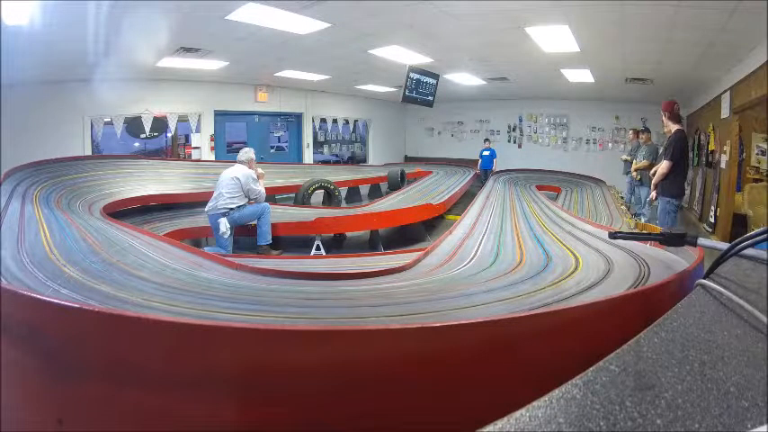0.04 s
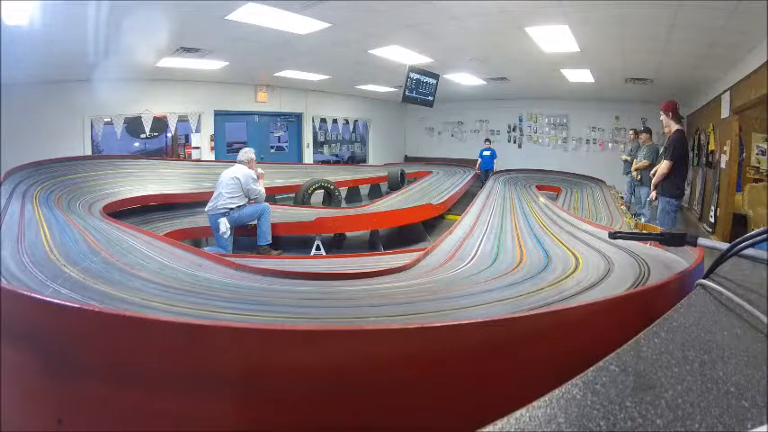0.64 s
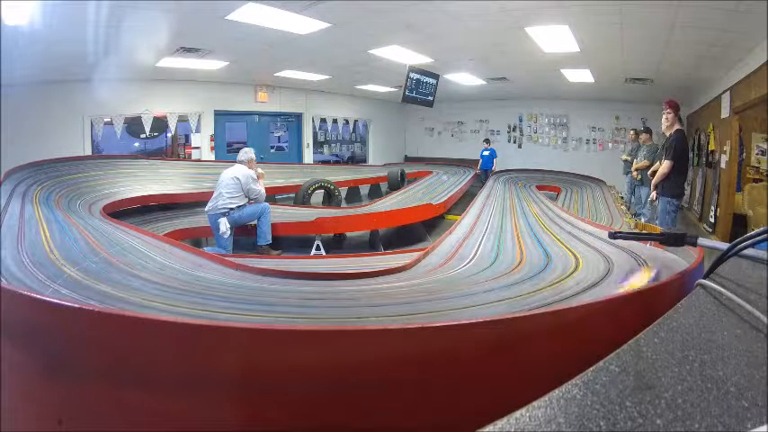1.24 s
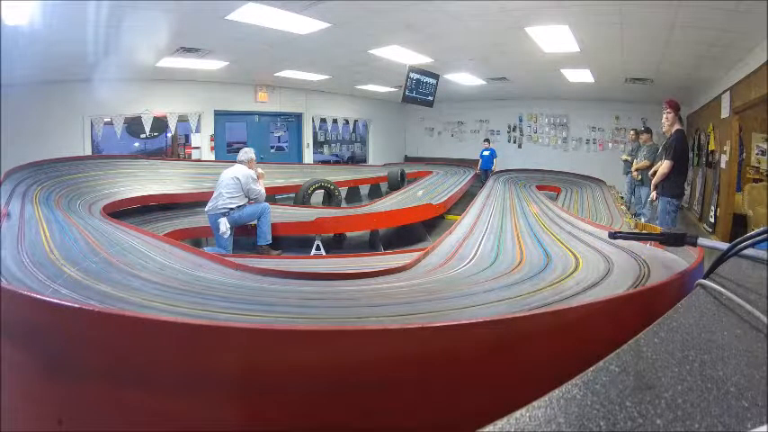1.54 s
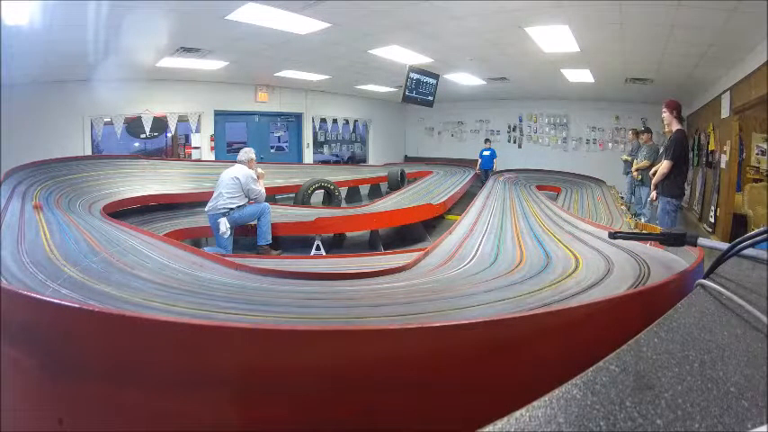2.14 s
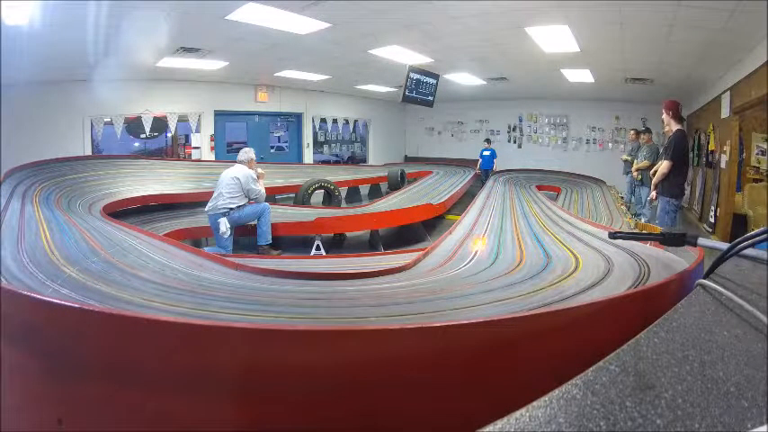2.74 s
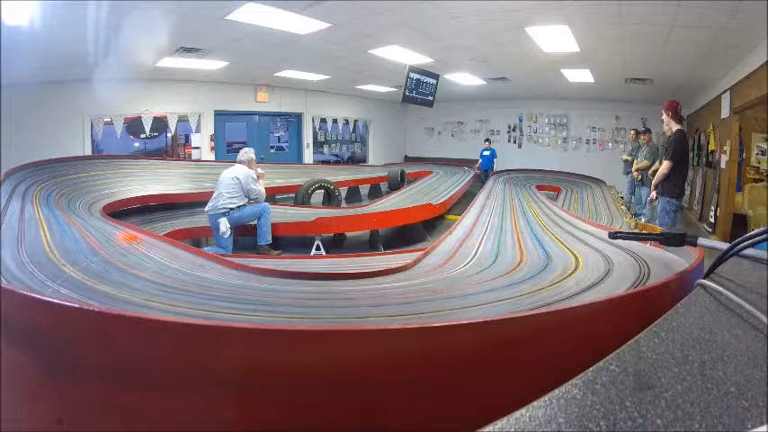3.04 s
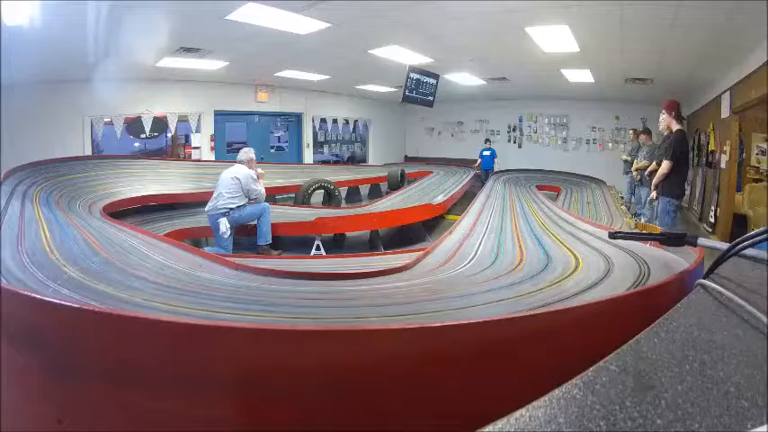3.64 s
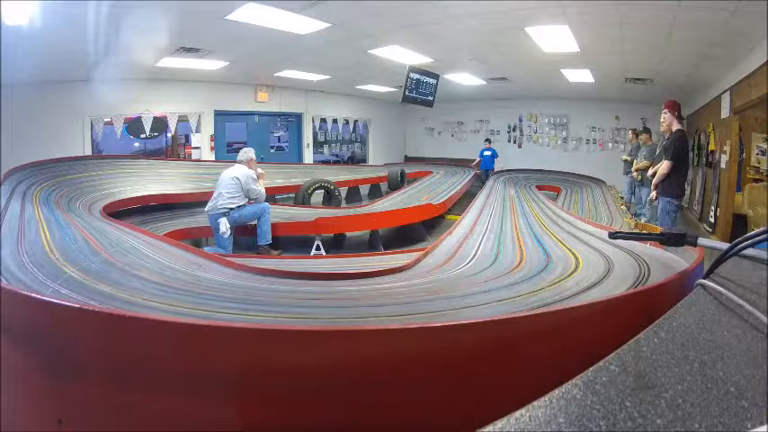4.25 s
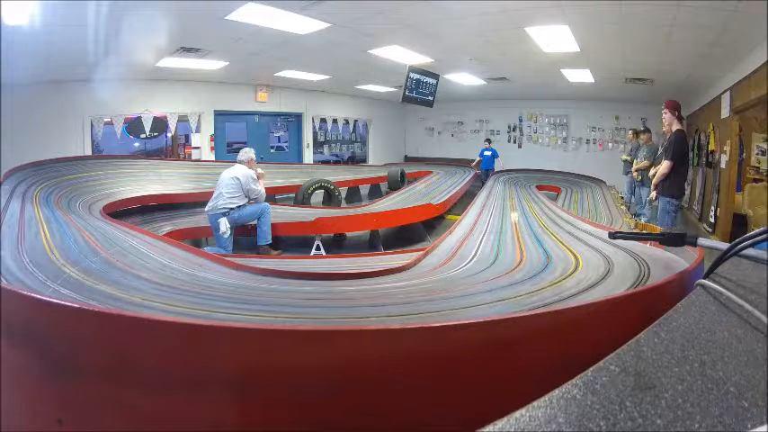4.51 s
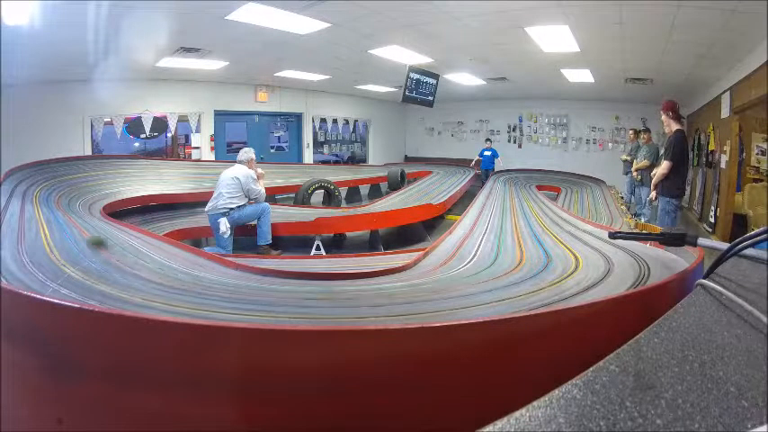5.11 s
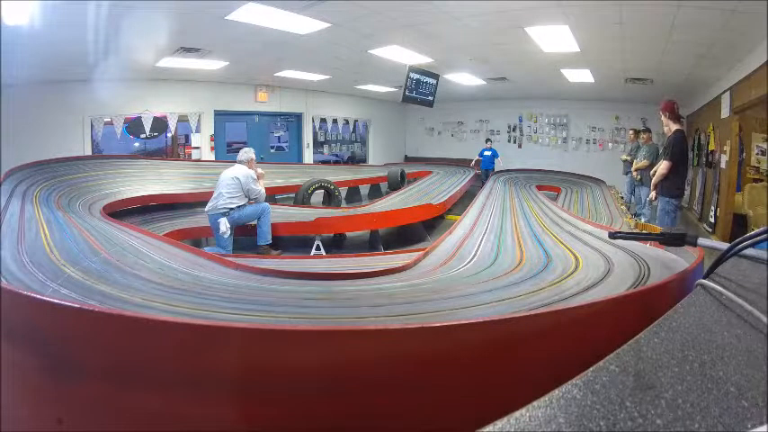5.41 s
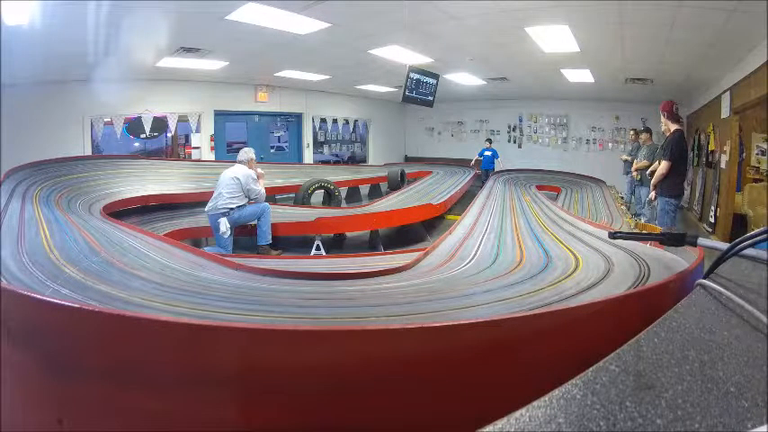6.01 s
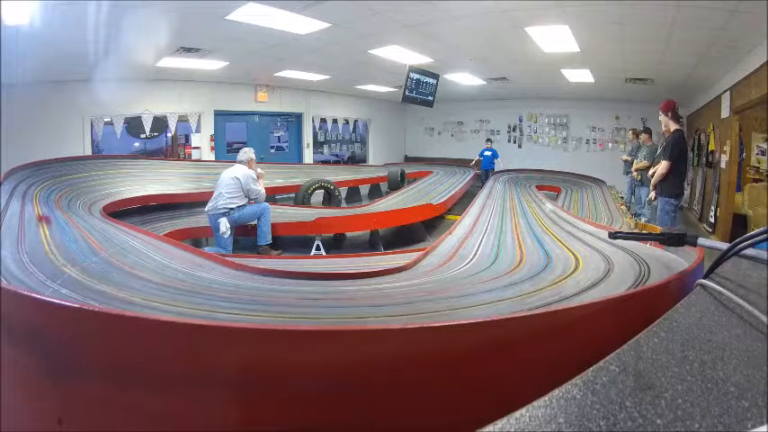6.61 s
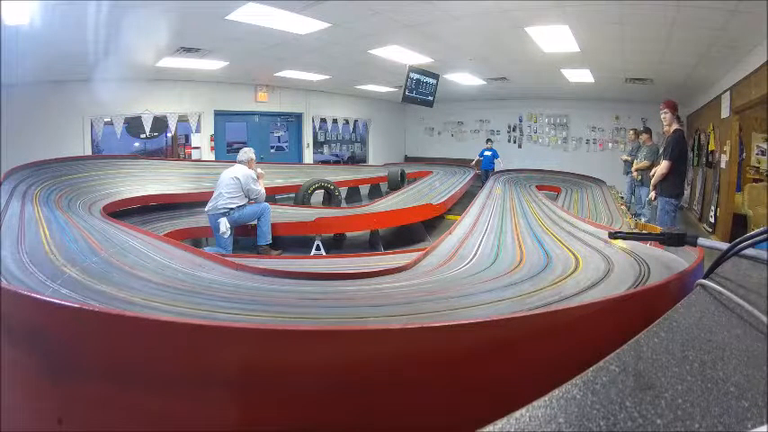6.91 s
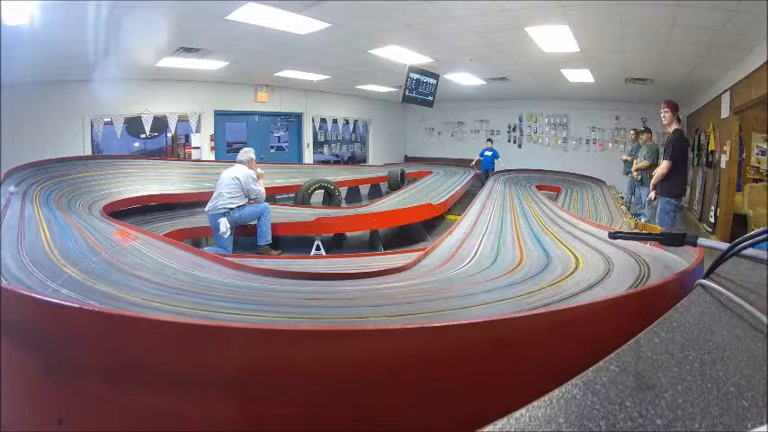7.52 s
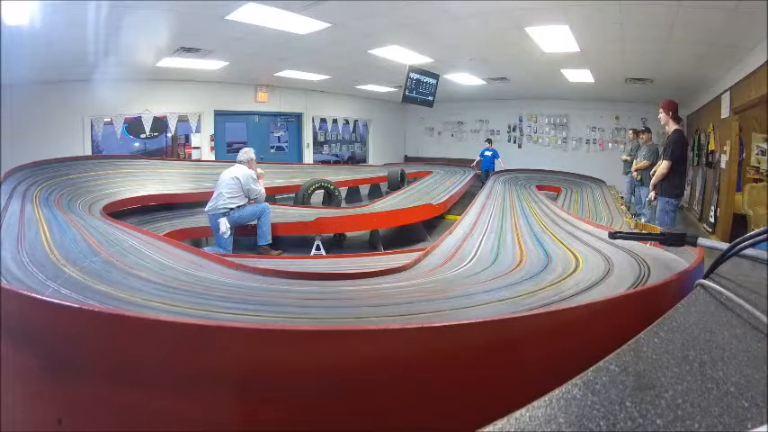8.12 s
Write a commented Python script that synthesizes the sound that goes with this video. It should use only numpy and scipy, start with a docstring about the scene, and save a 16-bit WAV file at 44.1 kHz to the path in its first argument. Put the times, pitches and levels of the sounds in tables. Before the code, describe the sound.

From beside the bend of an indoor wooden track, slot cars are heard speeding up and braking in short, overlapping high whines. Three times a car powers past nearby, its gears rattling and its pitch sweeping upward: once early, then twice in the second half. Hollow rolling noise and metallic hiss swell with each pass, with faint motor hums and sharp little ticks, while the far cars keep racing in a lightly echoing hall.

```python
"""Slot cars race round a big wooden track in a shop hall, heard from just outside the banked turn.
From the start, far cars speed up and brake while tyres drum on the hollow deck and pickup braids hiss.
Near 1 s a car powers through the turn: its ten-tooth pinion whines up over its three-pole motor's hum,
its gears chatter and it hops in the slot. A second follows near 5 s, a third near 7 s. Ringing ticks
and high shrieks dot the way, the hall blurs the whines, and the far cars race on to the end."""
import sys
import numpy as np
from scipy import signal
from scipy.fft import rfft, irfft, next_fast_len
from scipy.io import wavfile
from scipy.ndimage import uniform_filter1d, map_coordinates

SR = 44100
rng = np.random.default_rng(int(sys.argv[2]) if len(sys.argv) > 2 else 0)


def put_to_file(sound):
    """Save the sound as 16-bit audio at rate SR, in the file named by the first command-line argument."""
    columns = np.atleast_2d(sound).T  # one column per channel
    safe = np.clip(columns, -1, 1)
    whole_steps = np.round(safe * 32767)
    wavfile.write(sys.argv[1], SR, whole_steps.astype(np.int16))


N = 368676
T = np.arange(N) / SR

# gear mesh tone and the sidebands of the off-centre pinion: shaft_multiple, level_db
GEAR_LINES = [(8, -22), (9, -12), (10, 0), (11, -20)]
# motor unbalance, poles and commutator: shaft_multiple, level_db
MOTOR_LINES = [(1, -19), (3, -8.5), (6, 0)]
# how well the chassis radiates the motor: frequency_hz, gain_db
MOTOR_BODY_EQ = [(500, 1), (1500, -1), (2250, 3.5), (3200, -10), (3600, -2), (3950, 3), (4250, 3),
                 (4500, 0.5), (5000, -10)]
# bright peak near 13 kHz colouring the whine's octave and sizzle: frequency_hz, gain_db
BRIGHT_EQ = [(8500, -18.5), (10000, -6), (11500, 1), (12300, -0.5), (13000, 6), (13700, -7.5),
             (15500, -20.5)]


def car(t, tooth_hz, gear_gain, motor_gain, chatter, blur=1, flutter_db=1.95, fade_s=0.01,
        teeth=10, gear_ratio=2.5, jitter=0.00298, rattle_db=-4, overtone_db=-23, axle_db=-29):
    """One car's voice over the times t: gear whine, motor hum and axle thrum locked to one shaft."""
    size = len(t)
    shaft_hz = tooth_hz / teeth
    shaft = 2 * np.pi * np.cumsum(shaft_hz * (1 + jitter * wander(43, size))) / SR
    # teeth bouncing in their backlash scatter the tone; hard bounces spread it into a wide rattle
    chatter = np.clip(chatter, .1, 1)
    bounce = phasor(280, size) + undb(rattle_db) * phasor(800, size)
    mesh = np.sqrt(1 - chatter) * blur + np.sqrt(chatter) * bounce
    lines = sum(undb(db) * np.exp(1j * (k * shaft + 2 * np.pi * rng.random())) for k, db in GEAR_LINES)
    gear = unit(np.real(mesh * lines))
    # the octave shrieks as it crosses the bright peak
    overtone = undb(overtone_db + np.interp(2 * tooth_hz, *np.transpose(BRIGHT_EQ)))
    gear += overtone * np.real(mesh * np.exp(2j * teeth * shaft))
    # slightly oval tyres thrum once per turn of the rear axle
    motor = undb(axle_db) * np.sin(shaft / gear_ratio)
    for k, db in MOTOR_LINES:
        body_db = np.interp(k * shaft_hz, *np.transpose(MOTOR_BODY_EQ))
        wall_reflections = .65 + .92 * phasor(70, size)
        motor += undb(db + body_db) * np.real(wall_reflections * np.exp(1j * k * shaft))
    fade = np.clip(np.minimum(t - t[0], t[-1] - t) / fade_s, 0, 1)
    flutter = undb(flutter_db * wander(26, size))
    sound = fade * (gear * gear_gain * flutter + motor * motor_gain)
    return np.interp(T, t, sound, left=0, right=0)


# pitch and level curves of three runs through the near turn: time_s, pitch_hz, gear_db
FIRST_WHINE = [(1.1, 3521, -55.5), (1.16, 3995, -46), (1.245, 4910, -42), (1.31, 5380, -50),
               (1.36, 5605, -38), (1.44, 6080, -35), (1.5, 6233, -36), (1.528, 6262, -33.5),
               (1.596, 6602, -34), (1.648, 6860, -46.5), (1.7, 7162, -43), (1.788, 7394, -49.5),
               (1.88, 7365, -44), (1.966, 7500, -45.5), (2.05, 7346, -58)]
SECOND_WHINE = [(5.125, 4960, -53.5), (5.136, 4815, -45), (5.181, 5324, -33.5), (5.213, 5740, -32.5),
                (5.247, 5883, -34.5), (5.305, 6360, -31.5), (5.361, 6553, -39), (5.378, 6570, -41),
                (5.431, 6970, -42), (5.489, 6550, -53), (5.525, 6646, -42), (5.595, 6960, -43),
                (5.634, 6910, -46), (5.7, 7340, -44), (5.735, 7250, -45), (5.775, 7670, -52),
                (5.8, 7830, -51)]
THIRD_WHINE = [(7.07, 3950, -45), (7.12, 4324, -45), (7.133, 4437, -39.5), (7.2, 5100, -42.5),
               (7.252, 5550, -42), (7.356, 5896, -40), (7.41, 6300, -32), (7.46, 6660, -36),
               (7.488, 6725, -39), (7.66, 7370, -48), (7.699, 7310, -42), (7.79, 7510, -48),
               (7.924, 7620, -58.5), (7.97, 7900, -57.5)]
# each run's character: gear_boost_db, chatter_share, motor_peak_s, motor_db, motor_width_s
NEAR_VOICES = [(1.5, 0.42, 1.56, -42.5, 0.14), (3, 0.28, 5.6, -68, .2), (2, 0.48, 7.45, -44.5, 0.16)]
# the gears run cleanest in the middle of their speed range: pitch_hz, chatter_factor
CHATTER_BY_PITCH = [(4200, 0.77), (5400, 0.95), (6500, 0.19), (7100, 1.22)]


def near_cars():
    """Three cars power through the turn: the whine climbs with speed, the motor swells going by."""
    out = np.zeros(N)
    for run, voice in zip((FIRST_WHINE, SECOND_WHINE, THIRD_WHINE), NEAR_VOICES):
        boost_db, chatter, motor_peak_s, motor_db, motor_width_s = voice
        time_s, pitch_hz, gear_db = np.transpose(run)
        t = T[(T > time_s[0]) & (T < time_s[-1])]
        tooth_hz = np.interp(t, time_s, pitch_hz)
        gear_gain = undb(np.interp(t, time_s, gear_db) + boost_db)
        motor_gain = undb(motor_db) * swell(t, motor_peak_s, motor_width_s)
        chatter_factor = np.interp(tooth_hz, *np.transpose(CHATTER_BY_PITCH))
        out += car(t, tooth_hz, gear_gain, motor_gain, chatter * chatter_factor)
    return out


# dropouts of the near cars: time_s, depth_db
HOP_DIPS = [(1.385, 8), (1.468, 12), (1.51, 5), (5.298, 20), (5.5, 17.5), (5.572, 16.5), (7.65, 10.5)]


def hops(width_s=0.012):
    """A gain that ducks briefly each time a car hops in its slot."""
    return undb(-sum(depth_db * np.exp(-((T - s) / width_s) ** 2) for s, depth_db in HOP_DIPS))


def sizzle(whine, relative_db=-20, smooth_s=0.073):
    """High fizz of the gears, riding the envelope of the whine."""
    power = uniform_filter1d(whine ** 2, int(smooth_s * SR) + 1)
    fizz = colour(grains(30000, spread_db=2), BRIGHT_EQ)
    return undb(relative_db) * np.sqrt(np.abs(power)) * fizz


# whines round the track, rising on the throttle and falling on the brake; the row near 5.2 s is a # second,
# higher line of the second near car: # start_s, end_s, start_pitch_hz, end_pitch_hz, peak_s, gear_db,
# chatter_share
FAR_WHINES = [ (0, 0.222, 6680, 7593, .08, -40.5, 0.44), (0.188, 0.447, 7700, 8800, .24, -54, 0.64),
              (0.299, 0.45, 4030, 4800, .36, -46, .8), (0.37, 0.721, 4970, 6990, 0.56, -44.5, .85),
              (0.802, .92, 6600, 5020, .85, -42, 1), (.89, 1.038, 4890, 3470, .945, -47.5, .65),
              (1.336, 1.54, 5570, 6230, 1.42, -41, 0.45), (1.516, 1.782, 6006, 6447, 1.64, -40.5, 0.34),
              (2.021, 2.21, 6570, 8250, 2.09, -46, 0.51), (2.32, 2.42, 6250, 5450, 2.355, -43, .55),
              (2.381, 2.56, 5470, 5420, 2.44, -40.5, .6), (2.54, 2.872, 5340, 6470, 2.61, -44.5, .45),
              (2.69, 2.849, 5950, 6350, 2.79, -45.5, .55), (2.98, 3.228, 7380, 7550, 3.06, -44.5, 0.5),
              (2.86, 3.018, 4290, 4680, 2.95, -46, 1), (2.9, 3.042, 5500, 6050, 2.95, -42, 0.85),
              (2.997, 3.139, 6550, 7130, 3.04, -42.5, 0.62), (3.274, 3.521, 4690, 5420, 3.35, -47, 1),
              (3.42, 3.68, 5620, 6100, 3.52, -47, .85), (3.621, 3.901, 3870, 3980, 3.75, -50.5, 0.36),
              (3.91, 4.098, 5290, 5420, 3.99, -47.5, 0.68), (4.06, 4.187, 5085, 5960, 4.12, -47, 0.6),
              (4.129, 4.42, 6130, 7460, 4.18, -45, 0.88), (4.458, 4.588, 5720, 5050, 4.52, -43, 0.2),
              (4.599, 4.871, 3980, 4420, 4.71, -48, 0.14), (4.88, 5.009, 4510, 3680, 4.94, -40.5, 0.28),
              (4.96, 5.15, 3680, 4065, 5.05, -42.5, 0.16), (4.961, 5.128, 6300, 6730, 5.03, -43, .6),
              (5.186, 5.31, 5950, 6750, 5.225, -36.5, 0.35), (5.37, 5.51, 5200, 5800, 5.45, -42.5, .95),
              (5.91, 6.083, 5360, 4750, 5.97, -45, 0.9), (6.171, 6.316, 4130, 4420, 6.25, -50, 0.34),
              (6.237, 6.33, 6700, 5780, 6.28, -46, 0.57), (6.339, 6.526, 5453, 7163, 6.46, -42, 0.37),
              (6.5, 6.722, 7050, 8010, 6.56, -47, 0.67), (6.748, 7.067, 6400, 4910, 6.86, -50, 1),
              (6.972, 7.07, 5840, 5120, 7.0, -46, 0.38), (7.2, 7.6, 5400, 6330, 7.3, -37.5, 0.7),
              (8.01, 8.23, 5300, 5580, 8.1, -43.5, 0.75), (8.2, 8.38, 5580, 5950, 8.31, -39.5, 1)]


def far_cars(speed_lag_s=.7, width_share=0.305, motor_relative_db=-27, blur_hz=110):
    """Each whine eases to a new speed as it swells and fades, smeared by paths through the hall."""
    out = np.zeros(N)
    for start_s, end_s, start_hz, end_hz, peak_s, gear_db, chatter in FAR_WHINES:
        t = T[(T > start_s) & (T < end_s)]
        eased = 1 - np.exp(-(t - start_s) / speed_lag_s)
        tooth_hz = start_hz + (end_hz - start_hz) * eased / eased[-1]
        gain = undb(gear_db) * swell(t, peak_s, width_share * (end_s - start_s))
        # a smooth-running car keeps more of its pitch than a rattling one
        scattered = np.clip(1.1 * chatter, 0, 1)
        blur = np.sqrt(1 - scattered) + np.sqrt(scattered) * phasor(blur_hz, len(t))
        motor_gain = gain * undb(motor_relative_db)
        out += car(t, tooth_hz, gain, motor_gain, chatter, blur, flutter_db=1.36, fade_s=0.018)
    return out


# short ringing ticks and brief bursts of treble: start_s, level_db, ring_hz, decay_s
TICKS = [(.041, -37, 6900, 0.012), (0.576, -60, 432, 0.035), (1.115, -39, 5550, .02),
         (1.335, -39, 7840, 0.024), (1.355, -40, 8470, 0.014), (1.936, -35, 7440, 0.02),
         (2.335, -42.5, 6100, .025), (2.92, -38, 5720, 0.03), (5.126, -28, 5314, 0.008),
         (5.379, -29, 6660, .006), (5.598, -30, 6870, .008), (6.765, -38, 6400, .025),
         (7.129, -32, 4390, .01), (7.291, -28, 5770, .007), (7.49, -42, 1591, 0.013),
         (7.503, -34.5, 7480, 0.013), (7.69, -40, 6795, 0.061), (7.78, -37, 7050, 0.0225)]


def ticks(bandwidth_share=0.037, attack_s=0.00042):
    """Each tick starts sharply and rattles briefly round one pitch."""
    out = np.zeros(N)
    t = T[:SR // 4]
    for start_s, level_db, ring_hz, decay_s in TICKS:
        rattle = noise_band(t, ring_hz, bandwidth_share * ring_hz)
        envelope = np.exp(-t / decay_s) * (1 - np.exp(-t / attack_s))
        start = int(start_s * SR)
        out[start:start + len(t)] += (undb(level_db) * rattle * envelope)[:N - start]
    return out


# high narrow shrieks and scrapes: peak_s, level_db, centre_hz, half_width_hz, width_s
SHRIEKS = [(1.58, -52, 13020, 220, .09), (1.5, -52, 11000, 900, .09), (2.05, -53, 11500, 500, .04),
           (2.38, -51, 11000, 600, .05), (4.94, -46, 9400, 900, .05), (7.18, -49, 9200, 1000, 0.054),
           (7.42, -51, 12950, 220, .08)]


def shrieks():
    """High, narrow bands of noise swell and die away as cars pass."""
    out = np.zeros(N)
    for peak_s, level_db, centre_hz, half_width_hz, width_s in SHRIEKS:
        span = abs(T - peak_s) < 3 * width_s
        t = T[span]
        envelope = np.exp(-((t - peak_s) / width_s) ** 2 / 2)
        out[span] += undb(level_db) * noise_band(t, centre_hz, half_width_hz) * envelope
    return out


# tone of the hollow deck under the tyres: frequency_hz, gain_db
DECK_EQ = [(25, -55), (72, -55.5), (125, -28), (200, -22), (320, -19.5), (400, -14), (600, -8), (900, -6.5),
           (1150, -0.5), (1350, 2.5), (1800, -5), (2250, 0), (3000, -9), (6000, -39)]
# rasp of the chassis and thin plastic bodies: frequency_hz, gain_db
CHASSIS_EQ = [(600, -48), (1600, -10.5), (2250, -9), (2800, -4), (4000, -1), (5200, 0.5), (6300, 0),
              (7700, -5), (9000, -14), (14000, -43)]
# hiss of the braids on the rails: frequency_hz, gain_db
BRAID_EQ = [(3000, -31), (6000, 4), (8000, 4), (9500, 1), (11500, 2.5), (12400, -1), (13200, 1.5),
            (14100, -12), (15600, -14)]
# cars rolling by on nearby track, before each layer's trim: closest_s, level_db, width_s, scrape_boost_db
ROLL_BYS = [ (.05, -51, 0.13, 4), (.6, -51.5, 0.0535, -1.5), (.87, -51, 0.044, 0),
            (1.34, -44.3, 0.096, -1.5), (1.55, -49.5, 0.2, 3.5), (1.9, -41, 0.055, -11),
            (2.06, -52, 0.096, 5), (2.43, -49, 0.2, 1), (2.95, -44, 0.11, -2), (3.23, -48.5, 0.075, -2.5),
            (3.55, -56.5, 0.09, 6.5), (4.21, -58.5, 0.076, 5), (4.55, -53.5, 0.06, -3),
            (4.94, -47.5, 0.098, 3), (5.16, -50, 0.12, -12), (5.38, -51.5, 0.16, 6.5),
            (5.76, -48.5, 0.12, -12.5), (6.05, -58, 0.054, 2), (6.47, -45.5, 0.091, -3),
            (6.831, -44.5, 0.0572, 0.5), (7.2, -46.5, 0.059, 0), (7.36, -44, 0.11, 3.5),
            (7.73, -47.5, 0.18, -1), (8.27, -51.5, 0.12, 7.5)]


def rolling(deck_trim_db=-1, rasp_trim_db=8, hiss_trim_db=-0.5, rasp_scrape_share=0.36):
    """Tyres drum, chassis rattle and braids hiss; each pass swells out of a bed of distant traffic."""
    deck_power, rasp_power, hiss_power = undb([-53, -44.5, -53]) ** 2  # the far side of the track
    for closest_s, level_db, width_s, scrape_db in ROLL_BYS:
        power = (undb(level_db) * swell(T, closest_s, width_s)) ** 2
        deck_power += power * undb(deck_trim_db) ** 2
        rasp_power += power * undb(rasp_trim_db + rasp_scrape_share * scrape_db) ** 2
        hiss_power += power * undb(hiss_trim_db + scrape_db) ** 2
    drumming = panel_drift(colour(grains(9000, spread_db=1), DECK_EQ))
    deck = patchy(drumming, depth_db=3.5, rate_hz=12, bands=64)
    rasp = patchy(colour(grains(24000, spread_db=1), CHASSIS_EQ), depth_db=1.7, rate_hz=26, bands=40)
    hiss = patchy(colour(grains(30000, spread_db=0.5), BRAID_EQ), depth_db=2.1, rate_hz=24, bands=16)
    bumps = undb(0.78 * wander(rate_hz=12))  # the uneven track makes the level flutter
    return bumps * (deck * np.sqrt(deck_power) + rasp * np.sqrt(rasp_power) + hiss * np.sqrt(hiss_power))


def panel_drift(x, pitch_share=.03, rate_hz=2.5):
    """Resonances shift a little as the cars cross from one deck panel to the next."""
    shift = np.cumsum(pitch_share * wander(rate_hz))
    return map_coordinates(x, [np.arange(N) + shift], order=3, mode="mirror")


def patchy(x, depth_db, rate_hz, bands):
    """Each band swells and fades alone as the cars move over other parts of the track; rms 1."""
    size = next_fast_len(N)
    log_hz = np.log(np.fft.rfftfreq(size, 1 / SR) + 1)
    band_position = np.interp(log_hz, np.log([100, 15000]), [0, bands - 1])
    spectrum = rfft(x, size)
    out = np.zeros(N)
    for k in range(bands):
        steps = rng.standard_normal(1024)
        gain = undb(depth_db * np.interp(T * rate_hz, np.arange(len(steps)), steps))
        band = irfft(spectrum * np.clip(1 - abs(band_position - k), 0, 1), size)[:N]
        out += gain * band
    return unit(out)


# gliding motor and axle hums, near and far: start_s, end_s, start_pitch_hz, end_pitch_hz, level_db
HUM_GLIDES = [(0.709, 0.807, 2235, 2273, -54), (0.751, 1.31, 547, 591, -66),
              (1.0, 1.748, 1371, 1566, -57.5), (1.28, 1.601, 1600, 1974, -49),
              (1.623, 2.059, 2149, 2334, -55), (1.7, 2.3, 730, 830, -64.5), (1.95, 2.6, 145.4, 164.5, -82),
              (2.042, 2.3, 3220, 4040, -51), (2.955, 3.6, 600, 676, -65.5), (2.95, 3.452, 191, 227, -80.5),
              (4.577, 4.874, 1655, 1760, -64), (4.895, 4.986, 1740, 1881, -56),
              (4.65, 5.548, 125, 166, -85), (4.8, 5.6, 399.6, 470, -70), (4.996, 5.197, 650, 672, -62),
              (5.139, 5.203, 1146, 1400, -46.5), (5.682, 6.104, 1411, 1528, -54),
              (5.691, 5.953, 2850, 3020, -53), (6.333, 6.614, 1187, 1322, -52),
              (6.556, 6.797, 2230, 2340, -51.5), (7.278, 7.418, 3487, 3572, -46),
              (7.3, 7.411, 1705, 1790, -47.5), (7.519, 7.66, 3233, 3500, -47.5),
              (7.67, 7.763, 2202, 2259, -47), (7.971, 8.278, 2395, 2582, -53), (8.0, 8.36, 138, 155, -82)]


def motor_hums(blur_hz=10, blur_share=0.029):
    """Gliding hums swell and fade, blurred by their many paths through the hall."""
    out = np.zeros(N)
    for start_s, end_s, start_hz, end_hz, level_db in HUM_GLIDES:
        span = (T > start_s) & (T < end_s)
        along = np.linspace(0, 1, span.sum())
        phase = 2 * np.pi * np.cumsum(start_hz + (end_hz - start_hz) * along) / SR
        blur = phasor(blur_hz + blur_share * start_hz, len(along))
        arch = np.sqrt(along * (1 - along))
        out[span] += undb(level_db) * unit(np.real(blur * np.exp(1j * phase)) * arch)
    return out


def hall(x, split_hz=4000, low_t60_s=0.65, high_t60_s=0.37, build_s=0.0025):
    """Diffuse reverb of walls and low ceiling; the treble dies first."""
    t = T[:SR]
    tail = np.zeros(SR)
    for side, t60_s in (("low", low_t60_s), ("high", high_t60_s)):
        crossover = signal.butter(2, split_hz, side, fs=SR, output="sos")
        tail += signal.sosfilt(crossover, rng.standard_normal(SR)) * np.exp(-np.log(1000) * t / t60_s)
    tail *= 1 - np.exp(-t / build_s)
    return signal.fftconvolve(x, tail / np.sqrt(np.sum(tail ** 2)))[:N]


def mains_hum(pitch_hz=120, level_db=-96, waver_db=3):
    """The track's power supply hums faintly."""
    return undb(level_db + waver_db * wander(1.7)) * np.sin(2 * np.pi * pitch_hz * T)


def swell(t, closest_s, width_s, leaving_stretch=1.9, distance_power=1.25):
    """Gain of a passing car: 1 at its closest, falling with distance, more slowly as it leaves."""
    along = (t - closest_s) / (width_s * np.where(t > closest_s, leaving_stretch, 1))
    return np.hypot(1, along) ** -distance_power


def grains(per_second, spread_db):
    """Dense tiny impacts of uneven size; rms 1."""
    hit = rng.random(N) < per_second / SR
    return unit(hit * rng.standard_normal(N) * undb(spread_db * rng.standard_normal(N)))


def colour(x, eq):
    """Shape x with an EQ curve of (frequency_hz, gain_db) points; rms 1."""
    hz, db = np.transpose(eq)
    size = next_fast_len(N)
    log_hz = np.log(np.fft.rfftfreq(size, 1 / SR) + 1)
    gain = undb(np.interp(log_hz, np.log(hz), db))
    return unit(irfft(rfft(x, size) * gain, size)[:N])


def noise_band(t, centre_hz, half_width_hz):
    """Narrow noise round one pitch; rms 1."""
    return unit(wander(half_width_hz, len(t)) * np.sin(2 * np.pi * centre_hz * t))


def phasor(rate_hz, size):
    """A complex gain of rms 1 whose strength and phase drift at random."""
    return unit(wander(rate_hz, size) + 1j * wander(rate_hz, size))


def wander(rate_hz, size=N):
    """Smooth random motion; rms 1."""
    padded = next_fast_len(size)
    hz = np.fft.rfftfreq(padded, 1 / SR)
    spectrum = rfft(rng.standard_normal(padded)) / (1 + (hz / rate_hz) ** 4)
    return unit(irfft(spectrum, padded)[:size])


def undb(db):
    """Decibels to gain."""
    return 10 ** (np.asarray(db) / 20)


def unit(x):
    """Scale to rms 1."""
    return x / np.sqrt(np.mean(np.abs(x) ** 2))


def scene(wet_db=-9, low_cut_hz=160):
    """Whines, ticks and shrieks feed the hall, over a bed of hums and rolling noise; all centred."""
    near = near_cars() * hops()
    cars = near + sizzle(near) + far_cars() + ticks() + shrieks()
    # a high-pass takes the bass out of the cars
    cars = signal.sosfilt(signal.butter(4, low_cut_hz, "high", fs=SR, output="sos"), cars)
    sound = cars + undb(wet_db) * hall(cars) + motor_hums() + rolling() + mains_hum()
    return np.array([sound, sound])


def record(dry, high_cut_hz=15750):
    """A steep high cut takes off the very top."""
    return signal.sosfilt(signal.ellip(10, .2, 70, high_cut_hz, fs=SR, output="sos"), dry)


dry = scene()
out = record(dry)
put_to_file(out)
```